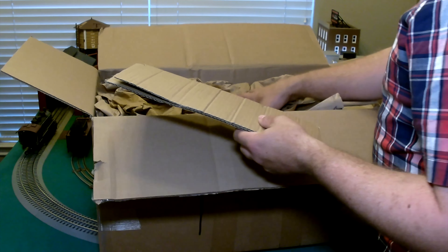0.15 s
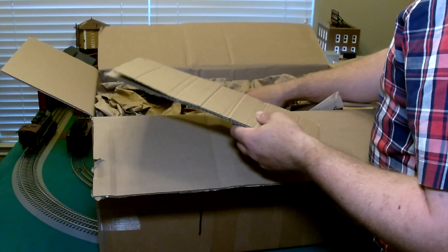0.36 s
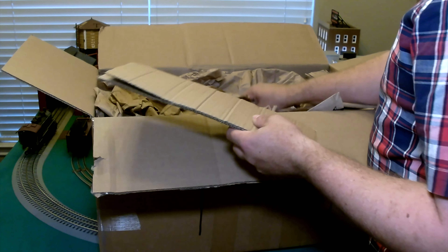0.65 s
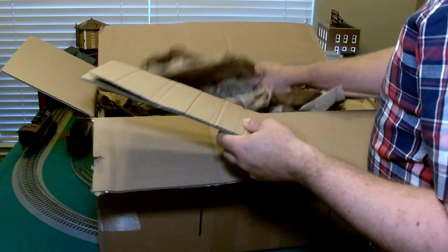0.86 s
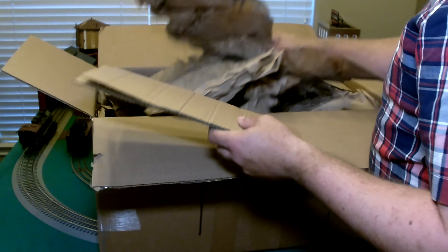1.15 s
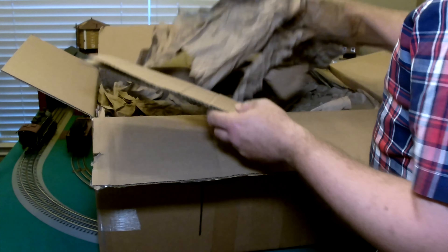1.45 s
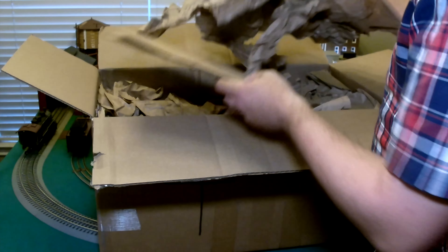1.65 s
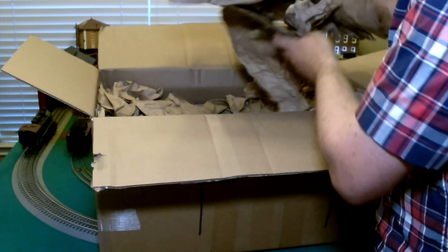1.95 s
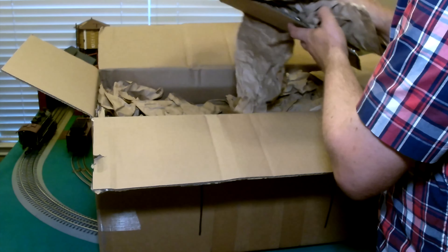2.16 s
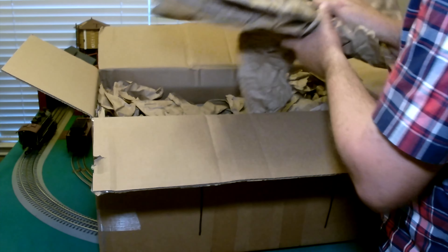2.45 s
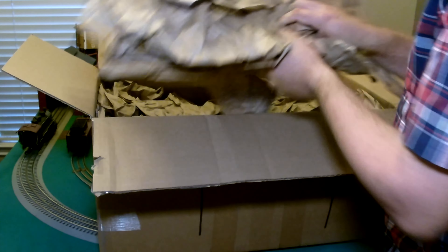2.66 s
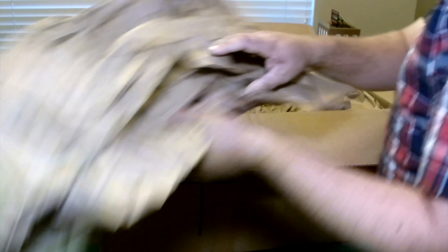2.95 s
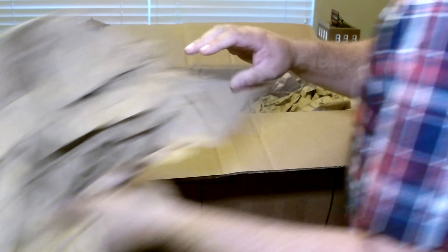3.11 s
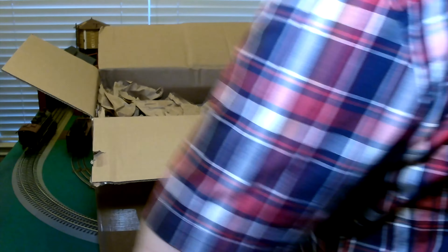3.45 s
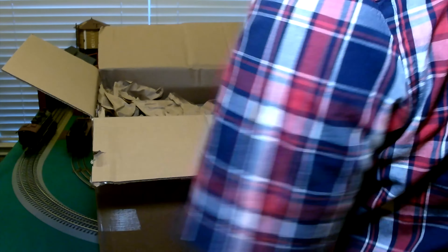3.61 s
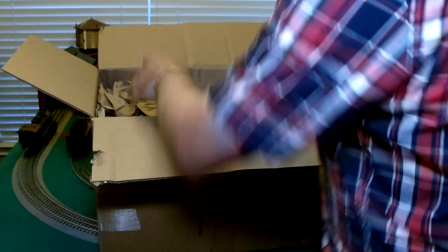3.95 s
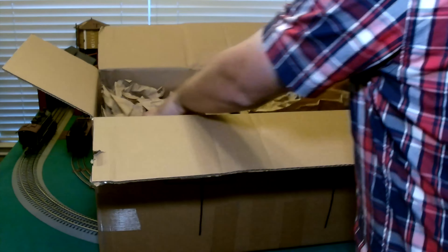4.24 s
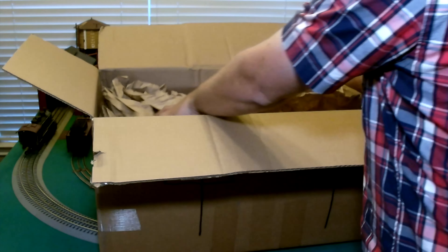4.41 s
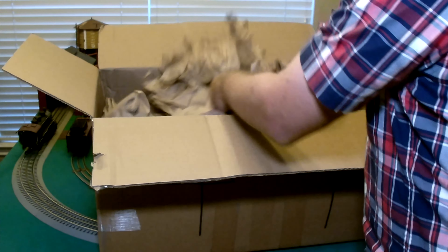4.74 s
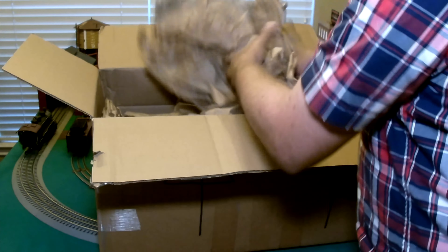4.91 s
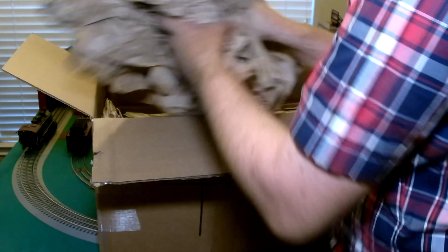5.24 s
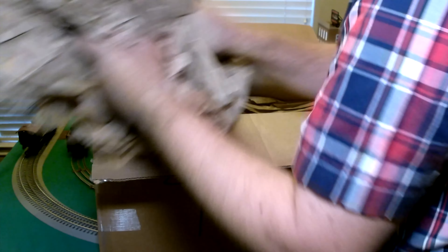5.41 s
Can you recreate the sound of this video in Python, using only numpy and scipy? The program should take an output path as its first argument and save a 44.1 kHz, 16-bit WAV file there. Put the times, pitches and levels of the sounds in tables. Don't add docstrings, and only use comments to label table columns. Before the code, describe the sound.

Close microphone in a quiet furnished room. Stiff packing paper crackles continuously in a cardboard box, with clumped creases, ticks and low box rumble. It thins as a bundle is lifted, clicks sharply, then is tossed with a soft thud around three seconds. A single hard, distorted board-like snap follows near 3.7 seconds, then hands rummage again and a second handful crumples louder.

```python
import sys
import numpy as np
from scipy import signal
from scipy.fft import rfft, irfft
from scipy.io import wavfile
from scipy.ndimage import uniform_filter1d

SR = 44100
rng = np.random.default_rng(int(sys.argv[2]) if len(sys.argv) > 2 else 0)


def persist_wave(psi):
    counts = np.round(np.clip(psi, -1, 1) * 32767).astype(np.int16)
    wavfile.write(sys.argv[1], SR, np.atleast_2d(counts).T)


def convert_level_to_amplitude(level_db):
    exponent = np.asarray(level_db, float) / 20
    return 10 ** exponent


N = 245725


def evened(x):
    return x / np.sqrt(np.mean(x ** 2) + 1e-20)


def read(points, hz):
    f, value = np.transpose(points)
    return np.interp(np.log(hz + 1), np.log(f + 1), value)


def add(mix, s, sound):
    part = mix[round(s * SR):][:len(sound)]
    part += sound[:len(part)]


def tent(t, s, before, after):
    return np.clip(np.minimum(1 + (t - s) / before, 1 - (t - s) / after), 0, 1)


def bumps(t, rows):
    return sum(db * tent(t, s, span / 2, span / 2) for s, db, span in rows)


def drift(per_s):
    span = int(SR / per_s)
    return evened(uniform_filter1d(uniform_filter1d(rng.standard_normal(N), span), span))


def burst(noise, hz, width_hz, t60, rise=0.00022):
    r = np.exp(-np.pi * width_hz / SR)
    t = np.arange(len(noise)) / SR
    ring = noise * convert_level_to_amplitude(-60 * t / t60) * np.minimum(t / rise, 1)
    for _ in range(2):
        ring = signal.lfilter([1, 0, -1], [1, -2 * r * np.cos(2 * np.pi * hz / SR), r * r], ring)
    return ring / abs(ring).max()


def kicked(count, length, kick, at):
    return rng.standard_normal((count, length)) + kick * (np.arange(length) == at)


def creases(per_s, spread_db, clump_db, t60, ring, count=24):
    size = convert_level_to_amplitude(spread_db * np.minimum(rng.exponential(1, N), 3.3)) * (rng.random(N) < per_s / SR)
    size = size * convert_level_to_amplitude(clump_db * drift(83).clip(-2, 2))
    kind = rng.integers(0, count, N)
    noise = rng.standard_normal((count, 600))
    fade = convert_level_to_amplitude(-60 * np.arange(600) / SR / t60)
    flips = np.zeros(N)
    for k, hz in enumerate(np.geomspace(400, 11000, count)):
        rattle = evened(noise[k] * fade) + ring * evened(burst(noise[k], hz, 0.5 * hz, t60))
        flips += signal.oaconvolve(size * (kind == k), rattle)[:N]
    z = rfft(flips)
    return z / np.sqrt(uniform_filter1d(abs(z) ** 2, 150))


def crumple(hz):
    broad = creases(per_s=2400, spread_db=2.5, clump_db=2.0, t60=0.018, ring=1.02)
    fine = creases(per_s=1500, spread_db=3.5, clump_db=2.0, t60=0.01, ring=0.95)
    slide = evened(rng.standard_normal(N) * convert_level_to_amplitude(0.84 * drift(13)))
    high = 1 / (1 + (3500 / (hz + 1)) ** 2)
    flips = np.sqrt(1 - high) * broad + np.sqrt(high) * fine
    grainy = read([(200, 0.72), (1000, 0.55), (4000, 0.44), (9000, 0.57)], hz).clip(0, 1)
    return grainy * flips + (1 - grainy) * rfft(slide) / np.sqrt(N)


# time in seconds, effort in dB, crispness in dB.
HAND_EFFORT = [(0, -36, 2), (.15, -36.5, 0), (.5, -31, -1.5), (.8, -36.5, -0.5), (.9, -35.5, -0.5),
               (1.0, -41, 1), (1.3, -41, 1.5), (1.9, -49, 3), (1.95, -38, 4), (2.85, -35, 0.5),
               (3.1, -35.5, 0), (3.35, -40, -1), (3.6, -39.5, -1), (4.0, -41.5, 2.5), (4.12, -33.5, -1.5),
               (4.85, -27, 1), (5.2, -32, -3.5), (5.57, -36, -7)]
# peak in seconds, extra dB, rise in s, release in s, extra crispness in dB.
HAND_SQUEEZES = [(.198, 4, 0.019, 0.082, -2), (.512, 3, 0.091, 0.14, -0.5), (1.052, -1, .02, 0.13, 1),
                 (1.61, 2.5, 0.055, 0.037, 1), (1.84, 7, 0.058, 0.079, -2.5), (1.94, 3, 0.075, 0.042, 1),
                 (2.166, 0.5, .05, 0.055, -2), (2.3, 4, 0.062, 0.076, -2.5), (2.418, 2, 0.031, 0.3, -1),
                 (2.93, 5.5, 0.019, 0.081, 1.5), (3.384, 9.5, 0.0035, 0.012, 1), (3.06, 4, 0.016, 0.078, 2),
                 (3.464, 6.5, 0.061, 0.12, 0.5), (3.53, 4.5, 0.092, 0.089, 3),
                 (3.72, 11, 0.026, 0.039, -4.5), (3.749, 15.5, 0.024, 0.26, 2.5),
                 (3.956, 4.5, 0.016, 0.011, 1), (4.102, 3, 0.019, 0.084, 6.5),
                 (4.165, 0.5, 0.015, 0.12, 4.5), (4.4, 1.5, 0.073, 0.15, 0), (4.82, 0, 0.19, 0.2, -1),
                 (5.076, 3, 0.077, 0.13, -1.5), (5.29, 8, 0.11, 1, 4.5), (5.46, -0.5, 0.094, 0.036, 4.5)]
# quietest point in seconds, depth in dB, fade in s, return in s.
HAND_LULLS = [(1.57, 3, 0.15, 0.043), (1.793, 10.5, 0.16, 0.0055), (2.09, 2.5, 0.025, 0.064),
              (2.206, 4, 0.037, 0.038), (2.384, 6, 0.064, 0.024), (2.806, 3, 0.07, 0.086),
              (3.372, 8, 0.064, 0.013), (3.406, 4.5, .02, .04), (3.678, 8, 0.043, 0.024),
              (3.746, -2, .008, 0.011), (4.02, 1, 0.097, .05), (4.296, 1.5, 0.065, 0.078),
              (4.63, 3, 0.074, 0.11), (5.19, -1, 0.061, 0.05), (1.0, 1, 0.11, 0.016),
              (3.0, 1, 0.059, 0.027), (4.966, 5, 0.045, 0.14), (5.528, 5.5, 0.054, 0.07)]


def hands(t):
    s, effort_db, crisp_db = np.transpose(HAND_EFFORT)
    effort_db, crisp_db = np.interp(t, s, effort_db), np.interp(t, s, crisp_db)
    for s, db, rise, release, edge_db in HAND_SQUEEZES:
        grip = tent(t, s, rise, release)
        effort_db, crisp_db = effort_db + db * grip, crisp_db + edge_db * grip
    for s, db, fade, back in HAND_LULLS:
        effort_db = effort_db - db * tent(t, s, fade, back)
    return effort_db, crisp_db


FOLD_SPLITS = [170, 620, 1800, 5000]
# dB per dB of effort, dB per dB of crispness, level in dB in the box, lifted, tossed.
FOLD_LAYERS = [
    (0.52, 0.5, -40.5, -43.5, -44),
    (1.0, -0.5, -10.5, -11.5, -10),
    (1.0, -0.5, -1.5, -3, -2.5),
    (0.89, 0.3, -1.5, -0.5, 0),
    (0.95, 1, -5, -4, -7),
]
# frequency in Hz, density in dB per Hz.
BOX_COLOUR = [(30, -38), (150, -19), (400, -9), (700, -3), (1000, -2.5), (1380, -2), (1650, -8.5),
              (2400, -6.5), (3600, -9), (4300, -10), (6000, -7.5), (8200, -7), (11300, -14.5), (14200, -31)]
# frequency in Hz, density in dB per Hz.
LIFTED_COLOUR = [(30, -46), (150, -22.5), (400, -5), (700, 1), (1000, -0.5), (1380, -1), (1650, -9),
                 (2400, -9.5), (3600, -12), (4300, -16), (6000, -10), (8200, -5.5), (11300, -13.5),
                 (14200, -31)]
# frequency in Hz, density in dB per Hz.
TOSSED_COLOUR = [(30, -25), (150, -15), (400, -9.5), (700, -1), (1400, 0), (2200, -4), (3700, -4),
                 (5600, -6.5), (6800, -10.5), (11500, -18.5), (14000, -27)]
# frequency in Hz, change in dB in the box, change in dB lifted.
NEXT_COLOUR = [(200, 0.1, 1.5), (500, -1, -2), (795, -2.5, -2.5), (1250, 0, -0.7), (2000, 1.5, 0),
               (3000, 0.1, -1), (4970, -0.3, -1), (10000, -0.3, 0.5)]
# time in seconds, place (0 box, 1 lifted, 2 tossed, 3 next in box, 4 next lifted).
PAPER_PLACE = [
    (0, 0),
    (1.5, 0),
    (1.8, 1),
    (3.2, 1),
    (3.42, 2),
    (4.04, 2),
    (4.3, 3),
    (5, 3),
    (5.2, 4),
]
# peak in seconds, extra rumble in dB, length in s.
BOX_NUDGES = [(0, 25, 0.18), (0.498, 10, 0.16), (0.976, 20, 0.38), (1.3, 12, 0.6), (1.77, 19, 0.15),
              (1.92, 9, .2), (2.348, 11.5, 0.4), (2.85, 10, .3), (4.066, 17, .2), (4.345, 16, 0.4),
              (4.68, 14, .15), (4.9, 13, 0.46), (5.296, 18, 0.74)]
# peak in seconds, extra flap in dB, length in s.
SHEET_FLAPS = [(0.1, 1, .3), (0.562, -5.5, 0.59), (1.05, 4, 0.26), (1.4, 3.5, .3), (1.7, 3, 0.41),
               (2.1, 3, 0.27), (2.5, -5, 0.65), (2.8, -0.5, 0.27), (3.05, 2, .2), (3.295, 2.5, 0.39),
               (3.55, -6, 0.4), (3.763, 1.5, 0.23), (4.1, 0.5, 0.41), (4.4, -1.5, 0.4), (4.64, 4, 0.35),
               (5.1, -5.5, 0.23), (5.4, -2, 0.37)]


def rustle():
    hz, t = np.fft.rfftfreq(N, 1 / SR), np.arange(N) / SR
    sound = crumple(hz)
    below = [0] + [1 / (1 + (hz / edge) ** 6) for edge in FOLD_SPLITS] + [1]
    effort_db, crisp_db = hands(t)
    place = np.interp(t, *np.transpose(PAPER_PLACE))
    rumble_db = 2.9 * drift(7.5) + bumps(t, BOX_NUDGES)
    extra_db = [rumble_db, bumps(t, SHEET_FLAPS), 0, 0, 0]
    lean = np.array(NEXT_COLOUR)
    colours = [read(colour, hz) for colour in (BOX_COLOUR, LIFTED_COLOUR, TOSSED_COLOUR)]
    colours += [colours[k] + read(lean[:, [0, k + 1]], hz) for k in range(2)]
    usual_db = -36
    out = np.zeros(N)
    for k, (follow, edge, *place_db) in enumerate(FOLD_LAYERS):
        level = convert_level_to_amplitude(usual_db + follow * (effort_db - usual_db) + edge * crisp_db + extra_db[k])
        band = sound * (below[k + 1] - below[k])
        for where, colour in enumerate(colours):
            gain = N / np.sqrt(2) / np.linalg.norm(band * convert_level_to_amplitude(colours[where % 3]))
            layer = irfft(band * convert_level_to_amplitude(colour), N) * gain
            here = np.maximum(1 - abs(place - where), 0)
            out += layer * level * convert_level_to_amplitude(place_db[where % 3]) * here
    return out


# start in seconds, peak in dB, ring in Hz, body in dB over the peak.
CREASE_TICKS = [(0.0473, -25, 6200, 2), (0.179, -17, 7930, -10), (0.191, -14, 8760, -20),
                (0.7635, -17, 8340, -8), (0.866, -25, 7100, -8), (1.019, -24.5, 6030, -10),
                (1.052, -20, 8400, -5), (1.1064, -21, 6640, -6), (1.8003, -46, 9150, -8),
                (1.9863, -26, 7700, 0), (2.0566, -19, 7060, 1), (2.2198, -9, 7400, -8),
                (2.252, -9, 8060, -8), (2.2845, -19, 7600, 2.5), (2.583, -14.5, 7950, -15),
                (2.5968, -10, 8200, -3), (2.752, -14.5, 6900, 0), (2.7952, -15, 7600, -5),
                (2.8584, -16, 7730, -2), (2.8918, -15, 7260, -6), (2.9207, -20, 7960, -5),
                (2.9408, -12.5, 7300, -6), (2.9519, -12, 7300, 0), (2.998, -17, 8040, -10),
                (3.3812, -32, 5360, -8), (3.4545, -20.5, 8000, 4), (3.7326, -17, 6000, 11.5),
                (4.1659, -12.5, 5100, -7), (4.562, -20, 6040, -9), (5.237, -17, 6610, -9)]
# start in seconds, peak in dB, ring in Hz.
CREASE_FINE_TICKS = [(0.109, -24, 7790), (0.222, -19, 8000), (0.253, -19, 6280), (0.349, -22, 5650),
                     (0.384, -20, 7800), (0.5726, -21, 6020), (0.6594, -24, 7080), (0.749, -22, 7750),
                     (1.1662, -27, 5950), (1.922, -25, 6390), (1.929, -23, 8260), (2.1234, -37, 8240),
                     (2.1789, -27, 9100), (2.2914, -18, 7820), (2.395, -24, 8350), (2.4545, -19.5, 8510),
                     (2.4946, -18, 7700), (2.5524, -18, 6850), (2.6524, -20, 7800), (2.7303, -16.5, 7840),
                     (2.817, -24, 6010), (2.9264, -20, 7140), (3.3294, -30, 7910), (3.4383, -29, 8720),
                     (4.1016, -26, 6300), (4.2043, -17, 8200), (4.3675, -20, 8520), (4.8115, -21, 8810),
                     (5.1113, -20.5, 7950), (5.1477, -20, 6000), (5.269, -18, 8430), (5.4151, -21, 8760)]


def ticks():
    out = np.zeros(N)
    rows = list(CREASE_TICKS) + [(*row, -9) for row in CREASE_FINE_TICKS]
    for s, db, hz, body_db in rows:
        bright, dull = kicked(2, 900, kick=5.0, at=12)
        add(out, s, convert_level_to_amplitude(db) * burst(bright, hz, width_hz=2400, t60=0.009))
        add(out, s, convert_level_to_amplitude(db + body_db - 3.5) * burst(dull, 2250, width_hz=1600, t60=0.012))
    return out


# start in seconds, peak in dB, ring in Hz.
LARGE_POPS = [(0.222, -10.5, 1320), (0.371, -12.5, 1370), (0.473, -8.5, 675), (0.736, -10.5, 1300),
              (0.862, -14, 1330), (1.0195, -13.5, 1320), (1.166, -20, 1330), (1.257, -13, 1400),
              (2.193, -15.5, 2900), (2.433, -12.5, 1060), (2.48, -11, 1980), (2.596, -15, 1170),
              (2.919, -9, 2070), (3.094, -8.5, 1310), (3.382, -22, 1350), (3.455, -13, 920),
              (3.7, -28, 697), (3.846, -9, 3920), (3.949, -16, 3830), (4.101, -11, 1413),
              (4.162, -10, 3950), (4.217, -11, 2330), (4.532, -15.5, 1420), (4.562, -9.5, 1440),
              (4.786, -10, 1370), (4.812, -17, 1540), (5.032, -9.5, 734), (5.092, -19, 1280),
              (5.356, -9, 2210), (5.469, -11, 1330)]
# start
# in seconds, peak in dB, ring in Hz.
BUNDLE_POPS = [(0.805, -13.5, 1310), (1.051, -17.5, 501), (1.108, -18, 1390), (1.8, -35, 1800),
               (2.179, -12, 1420), (2.283, -22, 1220), (2.402, -21, 1950), (2.493, -10, 1220),
               (2.549, -20, 2970), (2.752, -17, 1370), (2.816, -18, 1170), (3, -17, 3030),
               (3.115, -35, 1490), (3.151, -26, 805), (3.22, -12.5, 1390), (3.245, -17, 744),
               (3.293, -16, 1800), (3.329, -22, 1120), (3.398, -22, 1390), (3.525, -15.5, 1270),
               (3.548, -26, 1490), (3.571, -18, 1450), (3.77, -22, 1010), (3.795, -8, 883),
               (4.043, -19, 1190), (4.082, -18, 1770), (4.338, -10, 1260), (4.75, -18, 1370),
               (5.422, -14, 1360)]
# start in seconds, peak in dB, ring in Hz.
FURTHER_POPS = [(0.029, -27, 700), (0.141, -19, 659), (0.179, -17, 633), (0.19, -17, 1280),
                (0.232, -19, 1360), (0.385, -15, 1390), (0.507, -26, 883), (0.539, -16, 921),
                (0.928, -23, 1300), (1.682, -25.5, 729), (1.905, -33, 1200), (1.932, -26, 945),
                (2.025, -27, 1100), (2.103, -19, 2340), (2.142, -19.5, 2350), (2.159, -22, 1340),
                (2.299, -23, 988), (2.418, -17.5, 1030), (2.837, -20, 802), (2.858, -18, 1280),
                (2.947, -20, 689), (3.06, -22, 1110), (4.065, -25, 1110), (4.315, -17, 1090),
                (4.605, -22, 1310), (4.844, -16, 1200), (4.865, -12, 1070), (4.988, -16, 940),
                (5.159, -18, 1400)]
# start in seconds, peak in dB, ring in Hz.
TIGHT_POPS = [(0.166, -23, 3340), (0.253, -15, 2540), (0.475, -26, 3130), (1.052, -23, 3530),
              (1.1403, -33, 3800), (1.3906, -35, 2900), (1.6467, -29, 2550), (2.1241, -23, 3240),
              (2.154, -19, 2620), (2.2437, -18, 2970), (2.6489, -34, 2710), (2.7134, -25, 2840),
              (2.732, -22, 3250), (2.8415, -20, 3160), (3.0056, -16, 3090), (3.437, -21, 2900),
              (3.693, -25, 3240), (4.3954, -14, 2690), (4.793, -18, 2910), (5.0704, -18, 2700),
              (5.237, -21, 2890), (5.2594, -12, 2480), (5.2924, -24, 2670)]


def pops():
    out = np.zeros(N)
    rows = list(LARGE_POPS) + list(BUNDLE_POPS)
    rows += [(s, db + 2.5, hz) for s, db, hz in list(FURTHER_POPS) + list(TIGHT_POPS)]
    for (s, db, hz), noise in zip(rows, kicked(len(rows), 1500, kick=5.8, at=12)):
        add(out, s, convert_level_to_amplitude(db - 7.0) * burst(noise, hz, width_hz=950, t60=0.022))
    return out


# start in seconds, peak in dB.
EARLY_FOLDS = [(0.179, -19), (0.191, -19), (0.221, -15), (0.253, -16), (0.35, -18), (0.371, -12),
               (0.471, -16), (0.736, -17), (0.762, -14), (0.805, -19), (0.863, -18), (1.02, -19),
               (1.053, -17), (1.106, -16), (2.057, -17), (2.18, -14), (2.219, -12.5), (2.251, -24),
               (2.251, -10), (2.283, -17), (2.402, -15), (2.434, -19), (2.48, -18), (2.582, -9),
               (2.597, -14), (2.751, -10), (2.795, -10), (2.817, -19), (2.858, -14), (2.892, -14),
               (2.92, -17), (2.94, -9), (2.997, -13), (3.091, -18), (3.221, -26), (3.295, -21),
               (3.381, -20), (3.437, -23), (3.455, -15), (3.693, -13)]
# start in seconds, peak in dB.
LATE_FOLDS = [(3.95, -24), (4.044, -22), (4.065, -20), (4.082, -18), (4.101, -21), (4.166, -16),
              (4.218, -12), (4.315, -18), (4.339, -17), (4.532, -15), (4.562, -8), (4.786, -14),
              (4.811, -20), (4.989, -23), (5.148, -17), (5.157, -16), (5.236, -13), (5.421, -11)]
# start in seconds, peak in dB.
CRUMPLE_SPIKES = [(0.4755, -11), (0.566, -12), (0.612, -13), (1.261, -15), (1.281, -20), (4.7945, -11),
                  (4.815, -11), (4.852, -14), (5.094, -15), (5.108, -14), (5.269, -17), (5.284, -16),
                  (5.293, -14), (5.359, -11), (5.471, -10)]


def flicks():
    out = np.zeros(N)
    rows = list(EARLY_FOLDS) + list(LATE_FOLDS) + list(CRUMPLE_SPIKES)
    for (s, db), noise in zip(rows, kicked(len(rows), 400, kick=5.3, at=10)):
        add(out, s, convert_level_to_amplitude(db - 8.5) * burst(noise, 2370, width_hz=4900, t60=0.0074))
    return out


# start in seconds, level in dB.
LANDINGS = [
    (3.049, -34),
    (3.734, -49.5),
]
# frequency in Hz, width in Hz, level in dB, t60 in s.
SHAKE_MODES = [(230, 420, 1.5, 0.28), (125, 40, -3.5, 0.32), (75, 48, -11, 0.5), (54.7, 56, -6.5, 0.64),
               (29.8, 35, -15, 0.82)]


def thuds():
    out, t = np.zeros(N), np.arange(SR // 2) / SR
    boom_hz = 116.4 * (1 + 0.5 * np.exp(-t / 0.032))
    boom = np.sin(2 * np.pi * np.cumsum(boom_hz) / SR) * np.minimum(t / 0.01, 1) * convert_level_to_amplitude(-60 * t / 0.38)
    for s, db in LANDINGS:
        add(out, s, convert_level_to_amplitude(db - 1.5) * boom)
        for hz, width_hz, part_db, t60 in SHAKE_MODES:
            noise = rng.standard_normal(SR // 2)
            add(out, s, convert_level_to_amplitude(db + part_db) * burst(noise, hz, width_hz, t60, rise=0.0071))
    return out


# start in seconds, level in dB, brightness (1 is neutral).
BLOWS = [
    (3.7323, 7, 0.45),
    (3.7342, 2, 2.68),
    (3.738, -3, 1.3),
    (3.741, -11, 1.3),
]
# frequency in Hz, level in dB, t60 in s before damping.
BOARD_MODES = [(704, -15, 0.12), (1220, 8.5, 0.11), (1586, 12, 0.12), (3110, 14.5, 0.073), (3400, 8, 0.05),
               (4700, 4, 0.071), (6560, -24, 0.067), (7960, -29, 0.17)]


def snap():
    out, t = np.zeros(N), np.arange(SR // 10) / SR
    damping = 0.079
    for s, db, bright in BLOWS:
        for hz, mode_db, t60 in BOARD_MODES:
            tilt_db = 8 * (bright - 1) * np.log2(hz / 2000)
            fade_db = -60 * t / (damping * t60)
            add(out, s, convert_level_to_amplitude(db + mode_db + tilt_db - 16.0 + fade_db) * np.sin(2 * np.pi * hz * t))
    return signal.lfilter(*signal.butter(2, 300, "high", fs=SR), out)


# frequency in Hz, t60 in s.
ROOM_DECAY = [(200, 0.28), (1000, 0.79), (4000, 0.73), (12000, 0.14)]


def room(x):
    taps = np.zeros(SR // 2)
    at = np.arange(200, SR // 2 - 20, 20)
    taps[at + rng.integers(0, 20, len(at))] = rng.choice([-1., 1.], len(at))
    hz, t, z = signal.stft(taps, SR, nperseg=256)
    tail = signal.istft(z * convert_level_to_amplitude(-60 * t / read(ROOM_DECAY, hz)[:, None]), SR, nperseg=256)[1]
    return signal.fftconvolve(x, tail / np.linalg.norm(tail))[:N]


def scene():
    paper = rustle()
    clicks = ticks() + pops() + flicks()
    blows = thuds() + snap()
    echo = room(convert_level_to_amplitude(-17.0) * paper + convert_level_to_amplitude(-6.5) * clicks + convert_level_to_amplitude(-26) * blows)
    hiss = signal.lfilter([1, -1], [1, -1.7, .72], rng.standard_normal(N))
    return (paper + clicks + blows + echo + convert_level_to_amplitude(-82) * evened(hiss))[None]


def thinned(x, from_hz=11600, edge_hz=14400, starve=.95, hole=.84):
    hz, t, z = signal.stft(x, SR, nperseg=2048)
    band = uniform_filter1d(uniform_filter1d(abs(z), 12, 0), 3, 1)
    usual = uniform_filter1d(band, 40, 0)
    strong = (abs(z) > starve * band) & (band > hole * usual)
    kept = strong | (hz < from_hz)[:, None]
    edge = 1 + (hz[:, None] / edge_hz) ** 90
    return signal.istft(z * kept / edge, SR, nperseg=2048)[1][:N]


# start in seconds, end in seconds, share lost.
TOP_DROPOUTS = [
    (2.199, 2.231, .88),
    (2.746, 2.778, .85),
    (3.705, 3.741, .98),
]


def top_dropped(x):
    dull = signal.oaconvolve(x, signal.firwin(255, 8800, fs=SR)[None], "same")
    t = np.arange(N) / SR
    lost = sum(share * np.clip(np.minimum(t - a, b - t) / 0.0035, 0, 1) for a, b, share in TOP_DROPOUTS)
    return x + lost * (dull - x)


def low_pass(x):
    return signal.sosfilt(signal.butter(12, 15450, fs=SR, output="sos"), x)


def record(dry):
    ceiling = .51
    x = dry / (1 + abs(dry / ceiling) ** 4) ** .25
    x = thinned(x[0])[None]
    return low_pass(top_dropped(x))


dry = scene()
out = record(dry)
persist_wave(out)
```